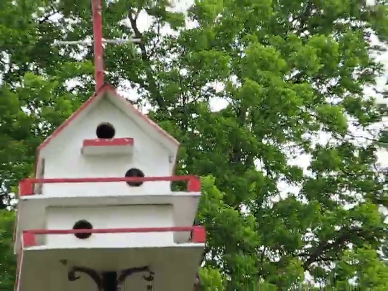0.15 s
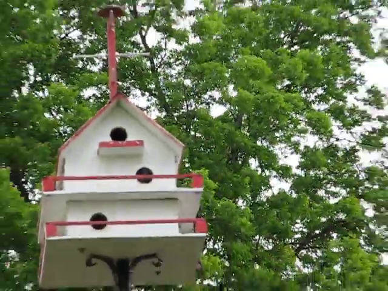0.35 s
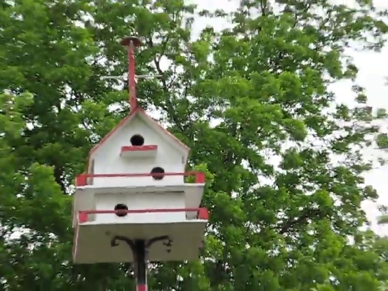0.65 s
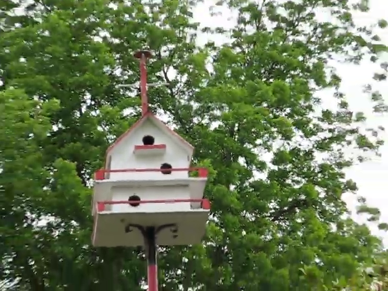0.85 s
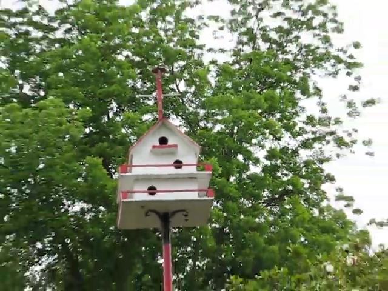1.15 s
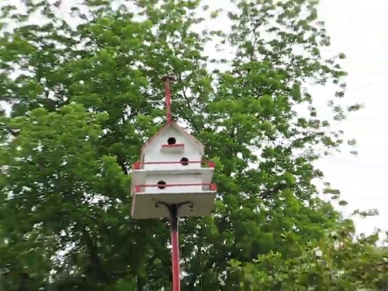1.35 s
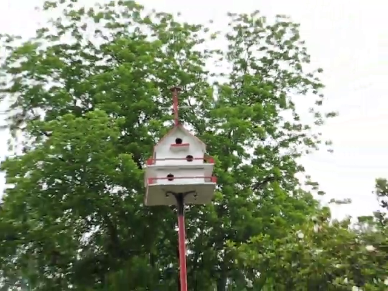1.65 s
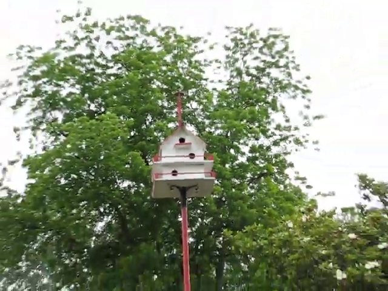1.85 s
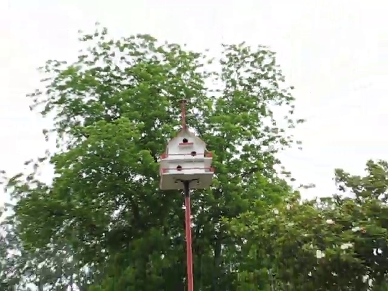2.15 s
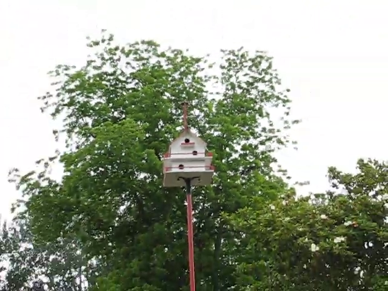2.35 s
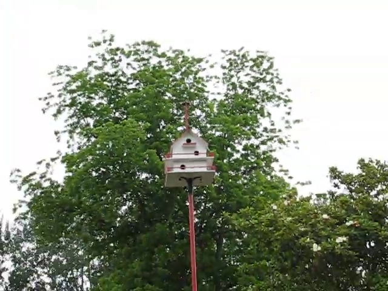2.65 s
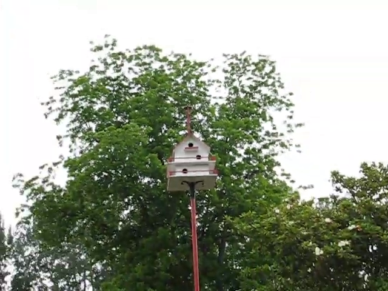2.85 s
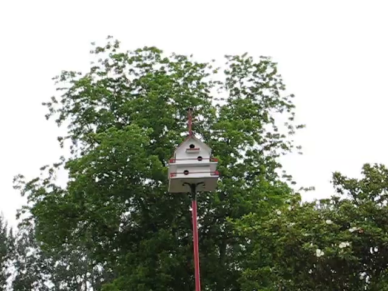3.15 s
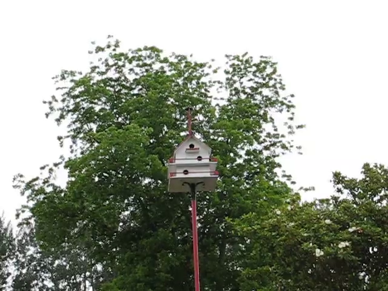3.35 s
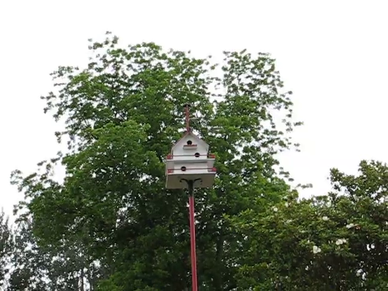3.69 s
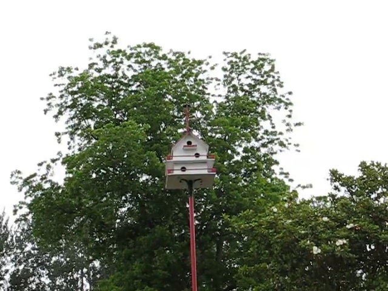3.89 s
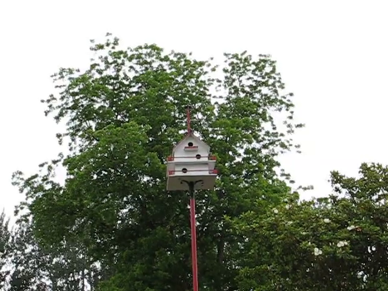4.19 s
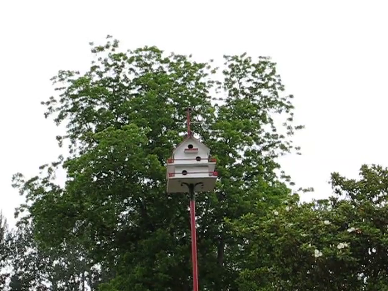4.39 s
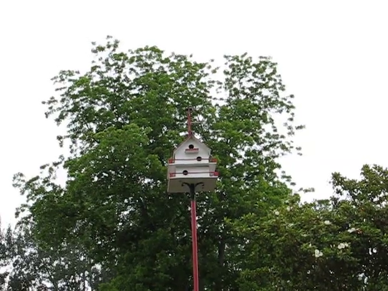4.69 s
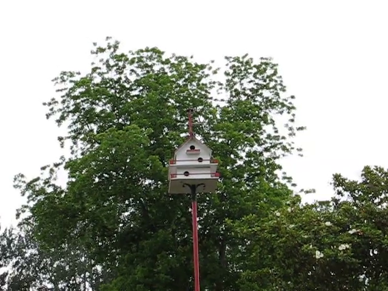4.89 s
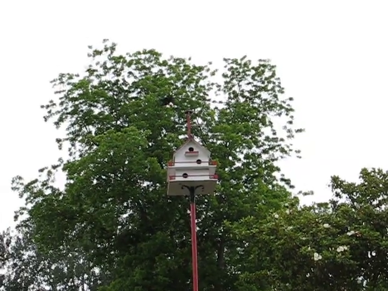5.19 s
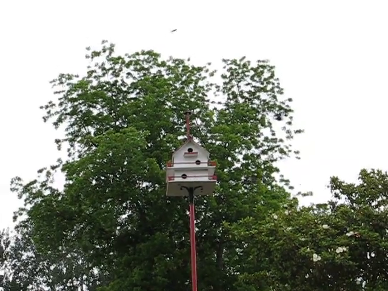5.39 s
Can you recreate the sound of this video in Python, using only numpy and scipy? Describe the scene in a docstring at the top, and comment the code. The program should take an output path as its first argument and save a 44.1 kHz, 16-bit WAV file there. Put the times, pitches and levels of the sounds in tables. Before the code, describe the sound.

Purple martins chirp, trill and gurgle around a birdhouse over soft outdoor hiss and a distant engine drone.

```python
"""Open air hisses at the microphone and a far engine drones, slowly speeding up. At once purple martins
call from a nest house on a pole: falling chews, then buzzy trills, rattled pips and gurgled whistles,
each a gliding tone from the syrinx with overtones coloured by the beak. Every call arrives with one
close reflection and a soft scatter from the trees. Small songbirds sing deep in the foliage; a few dry
ticks, a brief low rumble and some scratchy clacks pass, and near the end more of the colony joins in."""
import sys
import numpy as np
from scipy import signal
from scipy.fft import rfft, irfft, next_fast_len
from scipy.io import wavfile
from scipy.ndimage import uniform_filter1d, map_coordinates

SR = 44100
rng = np.random.default_rng(int(sys.argv[2]) if len(sys.argv) > 2 else 0)


def to_wav(sig):
    """Store sig (one row per channel, or 1-D mono) as 16-bit WAV at the path in sys.argv[1].

    Samples outside -1..1 are clipped; the rate is SR.
    """
    pcm = np.clip(np.atleast_2d(sig), -1, 1) * 32767
    pcm = np.round(pcm).astype(np.int16)
    wavfile.write(sys.argv[1], SR, pcm.T)  # frames by channels


N = 243873


def amp(db):
    """Decibels to gain."""
    return 10 ** (np.asarray(db) / 20)


def unit(x):
    """Scale to rms 1."""
    return x / np.sqrt(np.mean(x ** 2) + 1e-20)


def along(points, hz):
    """Read (Hz, value) points on a log frequency axis."""
    freqs, values = np.transpose(points)
    return np.interp(np.log(hz + 1), np.log(freqs + 1), values)


def curve(points):
    """Read (seconds, value) points at every sample."""
    return np.interp(np.arange(N) / SR, *np.transpose(points))


def wobble(rate, size=N):
    """A smooth random curve with rate knots a second."""
    knots = rng.standard_normal(int(size * rate / SR) + 4)
    return map_coordinates(knots, [np.arange(size) * rate / SR])


def filtered(x, response):
    """Filter x by a complex response, given as a function of Hz."""
    size = next_fast_len(N + SR // 2)
    return irfft(rfft(x, size) * response(np.fft.rfftfreq(size, 1 / SR)), size)[..., :N]


def add(track, s, sound):
    """Mix a sound into a track at s seconds."""
    part = track[..., max(round(s * SR), 0):][..., :sound.shape[-1]]
    part += sound[..., :part.shape[-1]]


# Stereo width of noise at the microphone. Each row: frequency in Hz, side over mid in dB.
STEREO_WIDTH = [(100, -15), (250, -20.5), (600, -12.5), (1500, -7), (3000, -0.5), (6000, 1.5), (9000, 4),
                (14000, -4.5)]


def rush(spectrum, patchy_db):
    """Stereo noise of rms 1 with soft patches, narrow in the bass and wide in the treble."""
    bins = signal.stft(rng.standard_normal((2, N)), nperseg=512)[2]
    patches = uniform_filter1d(rng.standard_normal(bins.shape[1:]), size=7, axis=0)
    patches = uniform_filter1d(patches, size=16, axis=1)
    mid, side = signal.istft(bins * amp(patchy_db * unit(patches)), nperseg=512)[1][:, :N]
    mid = filtered(mid, lambda hz: amp(along(spectrum, hz)))
    side = filtered(side, lambda hz: amp(along(spectrum, hz) + along(STEREO_WIDTH, hz)))
    return unit(np.array([mid + side, mid - side]))


# The air all round the microphone, and its rumble. Each row: frequency in Hz, relative density in dB.
AIR_SPECTRUM = [(120, -14), (200, -2.5), (240, -4.5), (366, -3), (529, -7), (763, -3.5), (1210, -8.5),
                (1840, -8), (2290, -10.5), (2560, -8.5), (3250, -11.5), (3560, -13), (6640, -18.5),
                (11300, -37), (16000, -52)]
RUMBLE_SPECTRUM = [(15, -1), (30, 0), (50, -5.5), (72, 11), (100, 1), (140, -0.5), (170, -4.5), (210, -26),
                   (300, -39)]


def air(murmur_db=-38.0, hiss_db=-36.1, rumble_db=-41.5, split_hz=3500):
    """Open air: a low rumble, a broad murmur of distance and the hiss of leaves in a light breeze."""
    noise = rush(AIR_SPECTRUM, patchy_db=1.2)
    murmur = filtered(noise, lambda hz: 1 / (1 + (hz / split_hz) ** 4))
    leaves = noise - murmur
    rumble = rush(RUMBLE_SPECTRUM, patchy_db=2.5)
    return amp(murmur_db) * murmur + amp(hiss_db) * leaves + amp(rumble_db) * rumble


# Pace of the engine, far off. Each row: time in seconds, firings a second.
FIRING_RATE = [(0, 45), (1, 45.4), (2.5, 44.5), (4, 46.9), (5.53, 47.4)]
# Its hum as it reaches the microphone. Each row: time in seconds, level in dB.
HUM_LEVEL = [(0, -43), (.43, -37.5), (.88, -43.5), (1.1, -53), (1.7, -46.5), (2.62, -39.5), (2.85, -48),
             (3.9, -38), (5.53, -43)]
# The orders in that hum. Each row: multiple of the firing rate, offset from the hum level in dB.
HUM_ORDERS = [(2, -0.5), (3, -16), (4, -17)]


def engine(firing_db=-41, waver_db=1.7):
    """A far engine: only its lowest orders carry to the microphone, each wavering on the way."""
    firing_hz = curve(FIRING_RATE) * (1 + 0.0062 * wobble(6))
    phase = 2 * np.pi * np.cumsum(firing_hz) / SR
    orders = [(0.99, firing_db)] + [(round(k), curve(HUM_LEVEL) + db) for k, db in HUM_ORDERS]
    drone = np.zeros(N)
    for multiple, db in orders:
        drone += amp(db + waver_db * wobble(5.02)) * np.sin(multiple * phase + 2 * np.pi * rng.random())
    return np.sqrt(2) * drone


def glide(middle_hz, octaves, arch):
    """Start, middle and end pitch of a glide; arch lowers both ends by a share of its span."""
    droop = arch * abs(octaves)
    return middle_hz * 2 ** (-octaves / 2 - droop), middle_hz, middle_hz * 2 ** (octaves / 2 - droop)


def gesture(length, pitches, crest, bend=0):
    """Pitch and breath of a note: one swell, gliding through three pitches; bend lingers at each."""
    u = np.linspace(0, 1, max(int(length * SR), 16))
    progress = u - bend * np.sin(4 * np.pi * u) / (4 * np.pi)
    parabola = np.polyfit([0, .5, 1], np.log(pitches), 2)
    pitch = np.exp(np.polyval(parabola, progress))
    swell = np.sin(np.pi * np.interp(u, [0, np.clip(crest, .1, .9), 1], [0, .5, 1]))
    return pitch, np.abs(swell)


# Overtones of a full voice, at the bird. Each row: multiple of the pitch, relative level in dB.
SYRINX_OVERTONES = [(2, -22), (3, -30), (4, -39), (5, -33.5), (6, -36)]
# The beak's colouring of those overtones. Each row: frequency in Hz, gain in dB.
BEAK_RESONANCES = [(4000, -9), (5200, -14), (6300, 1), (7400, 4.5), (9500, -15.5), (11300, -7),
                   (12800, -0.5), (15500, -12)]


def syrinx(pitch, breath, bright_db, jitter, shimmer_db, ease_db=0):
    """An unsteady tone whose overtones swell in the beak's resonances; an easy voice loses the lowest."""
    unsteady_hz = pitch * (1 + jitter * wobble(695.5, len(pitch)))
    phase = 2 * np.pi * np.cumsum(unsteady_hz) / SR
    tone = np.sin(phase)
    for multiple, db in SYRINX_OVERTONES:
        k = round(multiple)
        level_db = db + bright_db + along(BEAK_RESONANCES, k * pitch) - ease_db * (2 / k) ** 2
        tone += amp(level_db) * np.sin(k * phase) * (k * pitch < SR / 2)
    return breath * amp(shimmer_db * wobble(343.6, len(pitch))) * tone


def placed(sound, db, pan_db, near_db=-19, scatter_slope=0.64, shade_slope=0.082):
    """Direct and scattered stereo parts of a call: faint birds are farther off and scatter more."""
    distance_db = max(near_db - db, 0)
    sides_db = np.array([[pan_db / 2], [-pan_db / 2]])
    direct = amp(db - shade_slope * distance_db + sides_db) * sound
    return np.array([direct, direct * amp(scatter_slope * distance_db)])


def sing(notes, bright_db, jitter, shimmer_db, second_db, taper, second_ratio=.8, bend=0, full_db=-13):
    """Gliding notes; in the loud ones the other side of the syrinx joins in at a lower pitch."""
    out = np.zeros((2, 2, N))  # direct and scattered, each left and right
    for s, length, pitches, db, crest, pan_db in notes:
        pitch, swell = gesture(length, pitches, crest, bend)
        ease_db = 2 * np.clip(full_db - db, 0, 6)
        lead = syrinx(pitch, swell ** taper, bright_db, jitter, shimmer_db, ease_db)
        second = syrinx(pitch * second_ratio, swell ** 2, bright_db, 2 * jitter, shimmer_db, ease_db)
        add(out, s, placed(lead + amp(second_db - ease_db) * second, db, pan_db))
    return out


# Chews from around the nest house. Each row: start in seconds, length in seconds, middle pitch in Hz,
# level in dB before distance shading, place of the crest from 0 to 1.
CHEW_CALLS = [(0.0137, .075, 3117, -12, .35), (0.2615, 0.041, 2410, -27.5, 0.15),
              (0.28, .043, 3660, -33, 0.57), (0.311, .037, 2080, -33.5, 0.77),
              (0.5946, .072, 3224, -11.5, 0.42), (0.738, .077, 2826, -16, 0.4),
              (1.658, 0.061, 2380, -20, 0.28), (2.1235, .051, 2520, -15.5, 0.28),
              (2.5125, .059, 2613, -16.7, .37), (3.597, .068, 2680, -31, 0.28),
              (4.442, .05, 2780, -34, 0.33), (4.4946, .057, 2150, -30.5, 0.26),
              (4.5035, .051, 3640, -31.5, 0.54), (4.711, .046, 3510, -28.5, 0.54),
              (4.762, .067, 2720, -25, .37), (4.907, 0.053, 3700, -29, 0.72),
              (5.1944, .052, 2440, -25, 0.1), (5.223, .037, 3450, -30, .7), (5.249, 0.057, 2064, -31, 0.26),
              (5.268, .068, 3115, -13.5, .42)]
CHEW_VOICE = dict(bright_db=1.5, jitter=.014, shimmer_db=2, second_db=-18, taper=1.25,
                  second_ratio=.66, bend=0.5)


def chews(octaves_per_s=18.3, usual_hz=3000, steepen=.3, pan_db=-1.8):
    """Chews slide down at much the same speed, high ones a little faster, so long ones fall farther."""
    notes = []
    for s, length, hz, db, crest in CHEW_CALLS:
        fall = octaves_per_s * (hz / usual_hz) ** steepen * length
        notes.append((s, length, glide(hz, -fall, arch=.048), db, crest, pan_db))
    return sing(notes, **CHEW_VOICE)


def near_path(x, echo_s=0.0045, echo_gain=0.51, lag_s=.000019):
    """One close reflection combs the glides; sound reaches the microphone's right side just ahead."""
    def response(hz):
        delay = lambda s: np.exp(-2j * np.pi * hz * s)
        return (1 + echo_gain * delay(echo_s)) * np.array([delay(lag_s / 2), delay(-lag_s / 2)])
    return filtered(x, response)


# Ring of the surrounding trees. Each row: frequency in Hz, seconds to fade by 60 dB.
FOLIAGE_DECAY = [(1000, 0.36), (3000, 0.44), (8000, .3), (15000, 0.14)]


def trees(x, early_db=-21, late_db=-22, early_t60=0.24, reach_s=0.068):
    """Diffuse answers: a quick one from the house and ground, a later one from the foliage."""
    hz, t, bins = signal.stft(rng.standard_normal((2, SR * 3 // 4)), SR, nperseg=256)
    build_up = 1 - np.exp(-(t / reach_s) ** 2)
    decay = amp(-60 * t / along(FOLIAGE_DECAY, hz)[:, None])
    late = signal.istft(bins * build_up * decay, SR, nperseg=256)[1]
    early = rng.standard_normal(late.shape) * amp(-60 * np.arange(late.shape[1]) / SR / early_t60)
    late *= amp(late_db) / np.linalg.norm(late[0])
    early *= amp(early_db) / np.linalg.norm(early[0])
    return signal.fftconvolve(x, late + early, axes=1)[:, :N]


# Ticks, the knock dead centre. Each row: start in seconds, level in dB, knock offset in dB,
# treble in dB (half of it applies from 10 kHz up), knock pitch in Hz.
DRY_TICKS = [(0.1564, -27, -9, -29, 891), (2.2019, -28, 3, -27, 1040), (2.2912, -24, 8.5, -20, 945),
             (2.352, -19, 1, -17, 1223), (5.388, -20.5, -11, -3, 802)]


def ticks(snap_db=1, snap_t60=.011, knock_db=-9, knock_t60=0.049):
    """Dry ticks: a bright snap and a small hollow knock."""
    out = np.zeros((2, N))
    t = np.arange(SR // 10) / SR
    hz = np.fft.rfftfreq(len(t), 1 / SR)
    for s, db, offset_db, treble_db, knock_hz in DRY_TICKS:
        hiss = rng.standard_normal((2, len(t)))
        colour = amp(along([(7500, 0), (10000, treble_db / 2)], hz))
        snap = irfft(rfft(hiss) * colour, len(t)) * amp(snap_db - 60 * t / snap_t60)
        knock = np.sin(2 * np.pi * knock_hz * t) * amp(knock_db + offset_db - 60 * t / knock_t60)
        add(out, s, amp(db) * (snap + knock))
    return out


# Small songbirds deep in the trees. Each row: start in seconds, length in seconds,
# start and end pitch in Hz, relative level in dB.
SONGBIRD_NOTES = [(0.326, .05, 3500, 3300, -36.5), (1.299, 0.049, 5210, 4900, -41.5),
                  (1.384, .04, 4190, 3970, -36), (1.83, .04, 5140, 4870, -43.5),
                  (1.887, .06, 3880, 4700, -43), (2.39, .07, 5200, 5060, -47),
                  (3.088, 0.11, 5450, 4370, -44), (3.588, .06, 5060, 4930, -44),
                  (3.87, .1, 4700, 3600, -42), (5.397, 0.054, 3600, 4440, -40)]


def far_songbirds(gain_db=-1.7, flutter_hz=120, swing=.03, scatter_db=4):
    """Thin wavering notes that reach the microphone mostly by way of the foliage."""
    out = np.zeros((2, 2, N))
    for s, length, start, end, db in SONGBIRD_NOTES:
        pitch, breath = gesture(length, (start, (start + end) / 2, end), crest=0.38)
        pitch *= 1 + swing * np.sin(2 * np.pi * flutter_hz * np.arange(len(pitch)) / SR)
        call = syrinx(pitch, breath, bright_db=-14, jitter=0.021, shimmer_db=4.5)
        add(out, s, placed(call, db + gain_db, pan_db=0))
    out[1] *= amp(scatter_db)
    return out


# Martins trilling to either side of the microphone. Each row: start in seconds, length in seconds,
# start, middle and end pitch in Hz, level in dB before distance shading, place of the crest from 0 to 1,
# left over right in dB, flutter rate in Hz, pitch swing in Hz.
TRILL_CALLS = [(0.427, 0.21, 3590, 3180, 3080, -23, 0.15, -3.5, 140.3, 235),
               (0.638, .17, 3830, 2860, 2600, -17.5, 0.41, -3.5, 140.8, 214),
               (1.418, 0.16, 3750, 3290, 3260, -37, .5, -8, 138.5, 220),
               (1.691, 0.13, 3664, 3310, 3400, -19.2, 0.52, -3, 143, 228),
               (3.329, 0.11, 3650, 3130, 2460, -26.3, 0.32, 11.5, 135.4, 460)]


def trills(throb=0.29, lean=0.34, fullness=.8, plain_db=-6, harsh_db=9, wide_swing_hz=450):
    """Buzzes: the pitch flutters in quick rises and slower falls, and the loudness throbs with it."""
    out = np.zeros((2, 2, N))
    for s, length, start, middle, end, db, crest, pan_db, flutter_hz, swing_hz in TRILL_CALLS:
        pitch, breath = gesture(length, (start, middle, end), crest)
        cycle = 2 * np.pi * np.cumsum(flutter_hz * (1 + 0.031 * wobble(59, len(pitch)))) / SR
        pitch += swing_hz * (np.sin(cycle) + lean * np.sin(2 * cycle))
        breath = breath ** fullness * (1 - throb * np.cos(cycle))
        bright_db = plain_db + harsh_db * (swing_hz / wide_swing_hz) ** 2  # wide swings sound harsher
        call = syrinx(pitch, breath, bright_db, jitter=0.011, shimmer_db=3)
        add(out, s, placed(call, db, pan_db))
    return out


# Rattles at the nest house, mostly straight ahead. Each row: start in seconds, number of pips,
# seconds per pip, middle pitch in Hz, fall of a pip in octaves, level at the run's centre in dB before
# distance shading, left over right in dB.
RATTLE_RUNS = [(0.4512, 4, .0246, 2720, .72, -16.8, 0), (0.9875, 2, .0205, 2720, .55, -20, -1),
               (1.029, 2, .027, 2640, .55, -21.7, -1), (1.638, 1, 0.028, 2610, .6, -21, -1),
               (2.1045, 1, .026, 2770, .45, -15.5, -1), (2.7845, 1, 0.019, 2423, 0.36, -22, 0),
               (3.4445, 4, .0248, 2450, .85, -20.3, -0.5), (3.79, 3, .025, 2780, 1.105, -30.5, 10.5),
               (4.6046, 1, .024, 2350, .55, -23, -1), (4.6285, 2, .0242, 2450, .72, -19.3, -1),
               (4.679, 1, .014, 2850, .65, -13.3, -2), (4.7007, 1, .016, 2510, 0.31, -21.5, 0),
               (4.826, 2, 0.02, 2155, 0.71, -24, 0), (4.8996, 1, .027, 2674, .4, -22, -1),
               (4.995, 1, .028, 2260, .9, -22.7, -1), (5.123, 3, 0.021, 2210, .9, -23.3, 0.5),
               (5.3211, 2, .027, 2810, 0.386, -14.8, -1), (5.379, 1, .032, 2890, 0.64, -28, -2),
               (5.504, 1, .016, 2730, 0.97, -21, -1)]


def rattles(pip_fill=.88, edge_db=1.3, crest=.24):
    """A rattle repeats one falling pip at an even pace, loudest in the middle of the run."""
    pips = []
    for s, count, step, hz, fall, db, pan_db in RATTLE_RUNS:
        pitches = glide(hz, -fall, arch=.08)
        for k in range(round(count)):
            off_centre = k - (round(count) - 1) / 2
            pip_db = db - edge_db * off_centre ** 2
            pips.append((s + k * step, pip_fill * step, pitches, pip_db, crest, pan_db))
    return sing(pips, bright_db=3, jitter=0.039, shimmer_db=2.3, second_db=-4, taper=1.05)


# The scratch in a rattling bird's voice. Each row: frequency in Hz, relative density in dB.
RASP_SPECTRUM = [(1200, -30), (2000, -3), (3200, 2), (5000, -6), (7000, -1), (9500, -17), (12000, -8),
                 (15500, -15)]


def rasp(pips, gain_db=-33, growth=0.52):
    """Noise that pulses with the pips but grows more slowly than their loudness."""
    loudness = np.abs(uniform_filter1d(np.abs(pips), size=64, axis=-1))
    return amp(gain_db) * loudness ** growth * rush(RASP_SPECTRUM, patchy_db=1.5)


def low_swell(peak_s=1.29, width_s=.13, centre_hz=160, db=-43):
    """A brief low rumble swells and fades."""
    band = [(centre_hz * 0.71, -30), (centre_hz, 0), (centre_hz * 1.33, -30), (centre_hz * 4, -90)]
    swell = np.exp(-((np.arange(N) / SR - peak_s) / width_s) ** 2)
    return amp(db) * swell * rush(band, patchy_db=1.0)


# The martins' gurgles, near centre. Each row: start in seconds, length in seconds, middle pitch in Hz,
# glide in octaves, level in dB before distance shading, left over right in dB.
GURGLE_NOTES = [(1.7236, 0.025, 2365, -.15, -21.5, 1), (2.1491, 0.028, 2393, -0.055, -19, 2),
                (2.184, .037, 2373, -0.14, -21, 0), (2.57, 0.046, 2250, -.39, -20.5, .7),
                (2.76, 0.029, 2196, -0.26, -26, .8), (2.799, .027, 2127, -0.19, -21, 1.3),
                (2.8303, .033, 1945, -0.23, -27, -1), (2.9295, .042, 2598, -.03, -21.7, -1),
                (2.975, 0.025, 1976, 0.085, -27.5, 0), (3.219, .0095, 3110, -.15, -18.6, -3),
                (3.248, .018, 2057, -0.11, -20.5, 0), (3.286, .012, 2010, -0.019, -25.7, -1),
                (3.956, .006, 2210, .35, -21, 1), (3.9915, 0.046, 2467, 0.024, -22.3, 1.5),
                (4.2005, .112, 2735, -.5, -13.7, -2), (4.4242, .062, 1452, -.13, -30, -1),
                (4.7092, 0.036, 2135, -0.17, -20.5, 2), (4.7467, 0.022, 2134, -0.049, -18, 2),
                (4.9751, 0.058, 1510, -0.33, -32.5, 0), (5.4765, 0.083, 1908, .11, -25.5, 1)]


def whistles(crest=0.35):
    """Nearly pure whistles swell quickly and fade along a shallow glide."""
    notes = [(s, length, glide(hz, octaves, arch=.05), db, crest, pan_db)
             for s, length, hz, octaves, db, pan_db in GURGLE_NOTES]
    return sing(notes, bright_db=0, jitter=0.0022, shimmer_db=2, second_db=-44, taper=0.88, full_db=-11)


# Clacks, wide across the microphone. Each row: time of the peak in seconds, relative level in dB.
CLACK_HITS = [(3.1074, -26.5), (3.6825, -23.5), (3.7617, -22), (3.8624, -20)]
# Their colour. Each row: frequency in Hz, gain in dB.
CLACK_COLOUR = [(1200, -19), (2400, 7), (3500, 3), (4800, 5.5), (7500, -2.5), (10000, -22.5), (15000, -29)]


def clacks(gain_db=-2, rise_s=0.0042):
    """Scratchy bursts of noise that swell within a few milliseconds and quickly die."""
    out = np.zeros((2, N))
    u = np.arange(SR // 20) / SR / rise_s
    envelope = u * np.exp(1 - u)
    for s, db in CLACK_HITS:
        add(out, s - rise_s, amp(db + gain_db) * envelope * rng.standard_normal((2, len(u))))
    return filtered(out, lambda hz: amp(along(CLACK_COLOUR, hz)))


def chatter(start_s=4.42, span_s=1.0, count=10, length_s=.035, hz=2450, db=-36.5, crest=.5, pan_db=0):
    """Farther from the microphone, the rest of the colony throws in short falling chirps at random."""
    notes = []
    for k, (when, high, loud) in enumerate(rng.random((count, 3))):
        s = start_s + span_s * (k + when) / count
        pitches = glide(hz * 2 ** (.3 * (2 * high - 1)), octaves=-.75, arch=.04)
        notes.append((s, length_s, pitches, db + 2 * (2 * loud - 1), crest, pan_db))
    return sing(notes, **CHEW_VOICE)


def scene():
    """Birds, ticks and clacks among the trees, over open air and the far engine."""
    pips = rattles()
    martins = chews() + trills() + pips + rasp(pips) + whistles() + chatter()
    direct, scattered = martins + far_songbirds()
    clicks = ticks() + clacks()
    background = air() + engine() + low_swell()
    return background + near_path(direct) + clicks + trees(scattered + clicks)


def record(dry, top_hz=15850):
    """The microphone's recorder keeps nothing above its band limit."""
    return filtered(dry, lambda hz: hz < top_hz)


dry = scene()
out = record(dry)
to_wav(out)
```